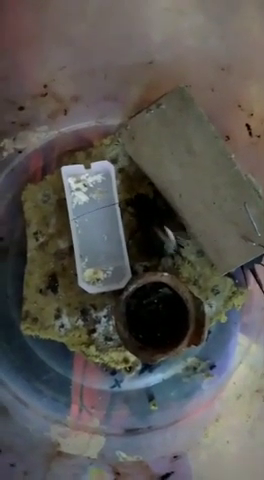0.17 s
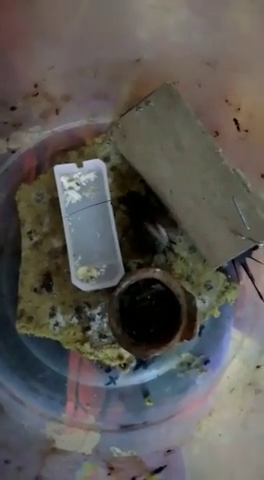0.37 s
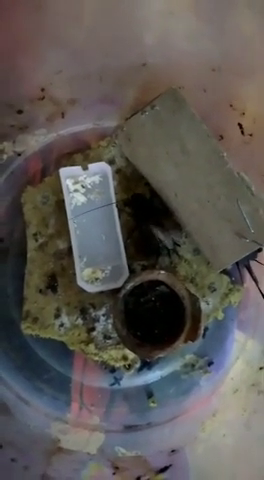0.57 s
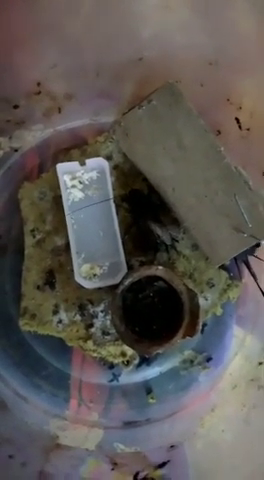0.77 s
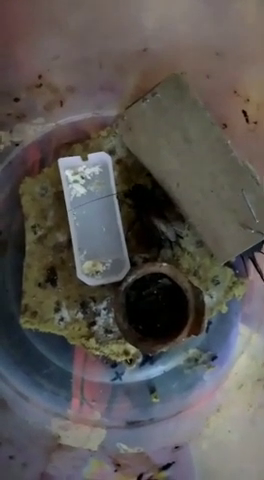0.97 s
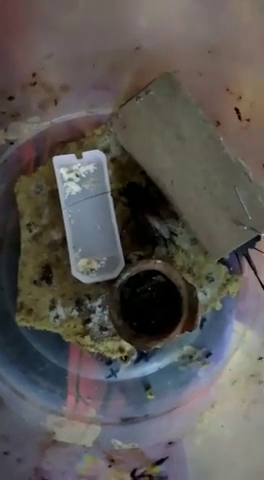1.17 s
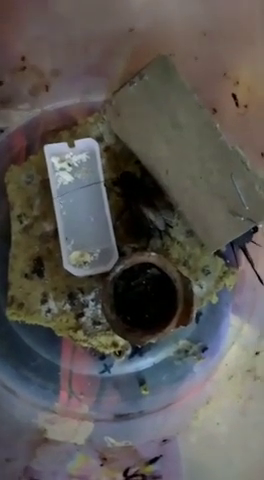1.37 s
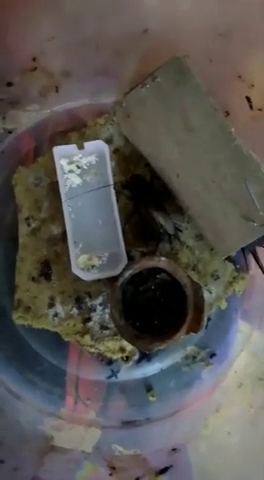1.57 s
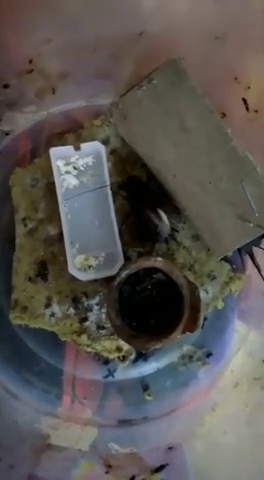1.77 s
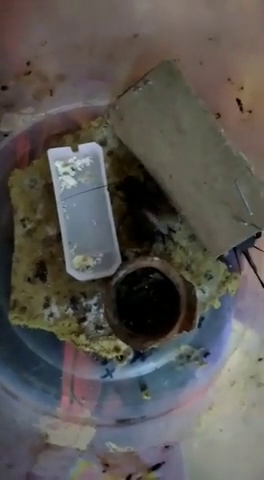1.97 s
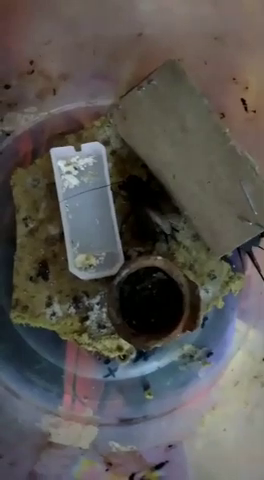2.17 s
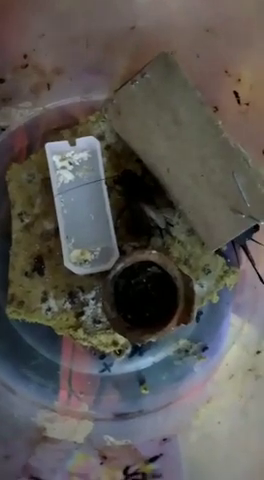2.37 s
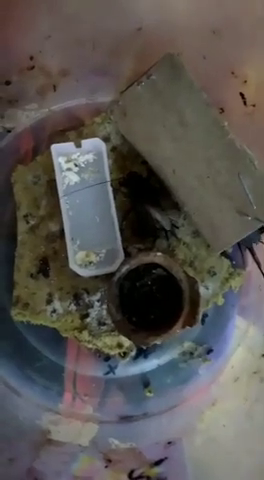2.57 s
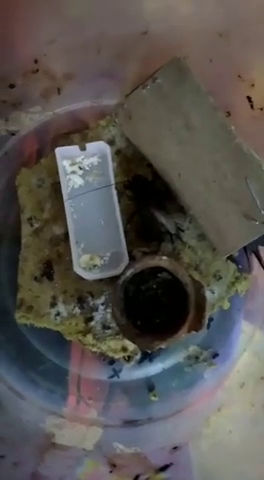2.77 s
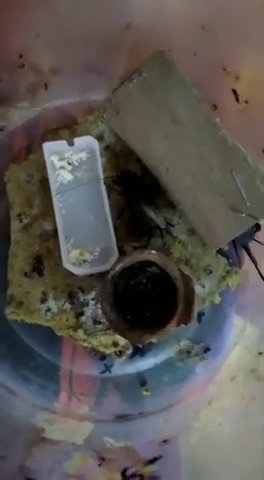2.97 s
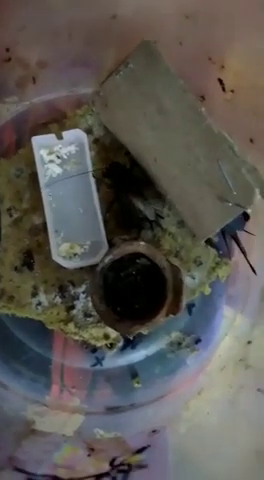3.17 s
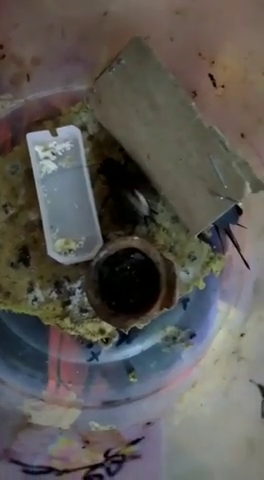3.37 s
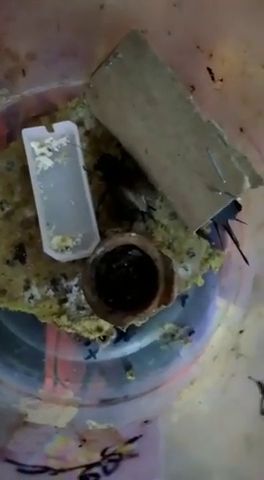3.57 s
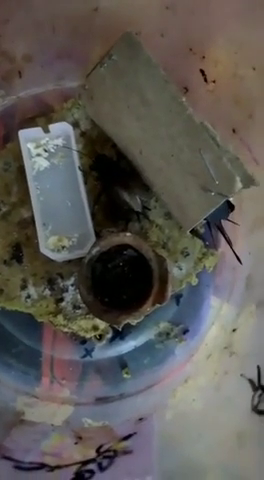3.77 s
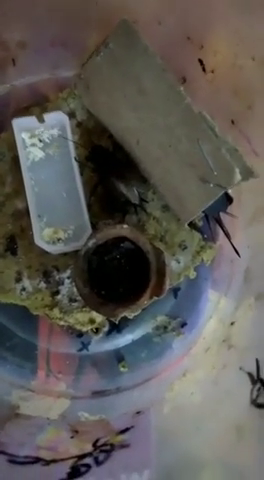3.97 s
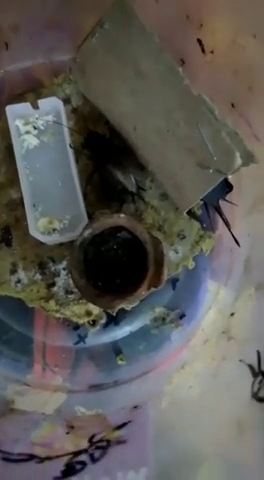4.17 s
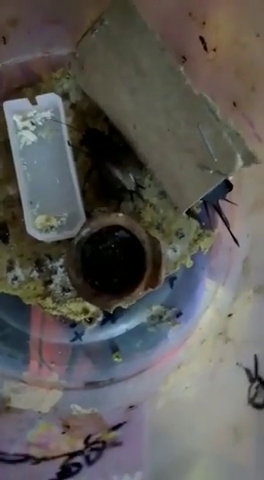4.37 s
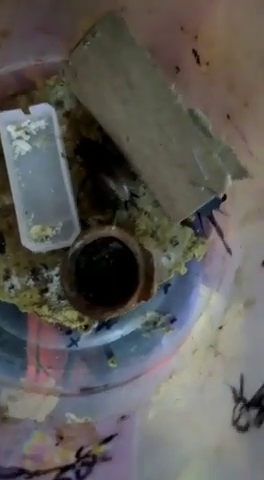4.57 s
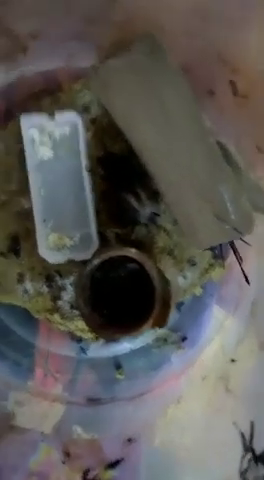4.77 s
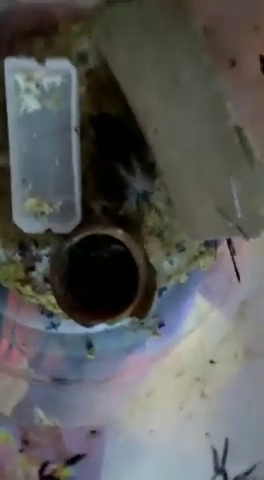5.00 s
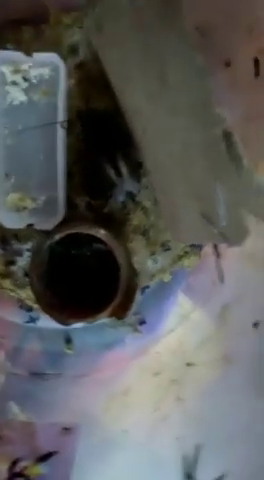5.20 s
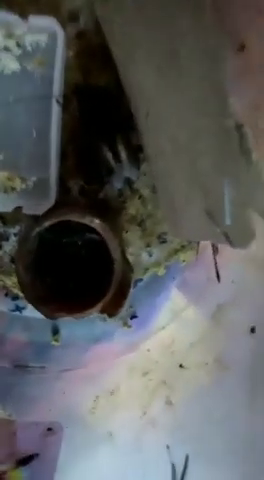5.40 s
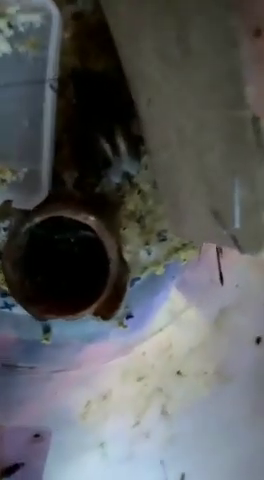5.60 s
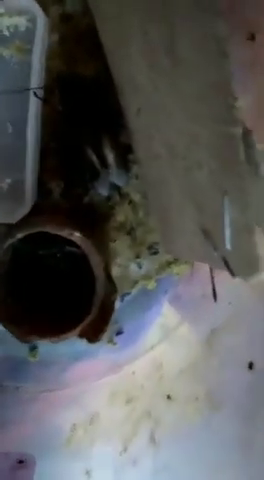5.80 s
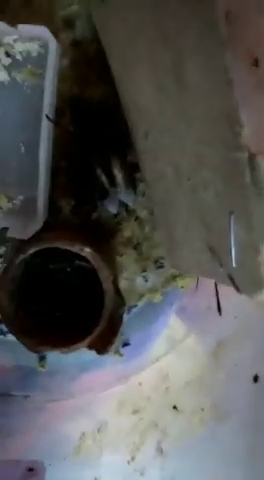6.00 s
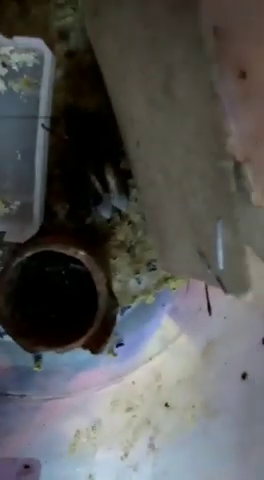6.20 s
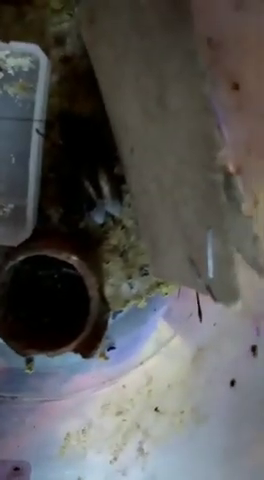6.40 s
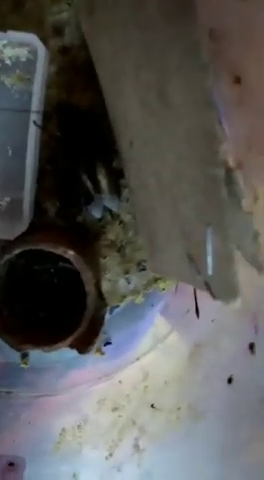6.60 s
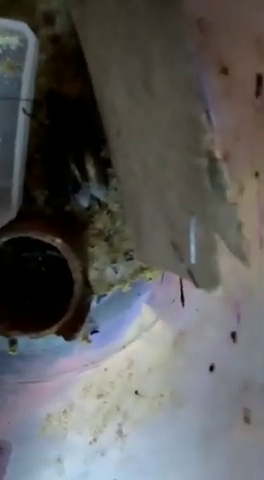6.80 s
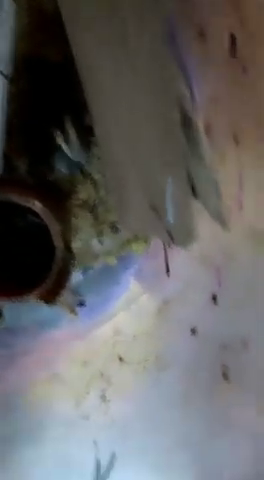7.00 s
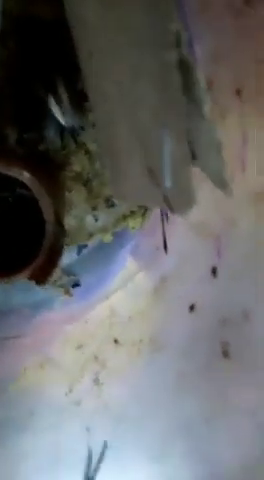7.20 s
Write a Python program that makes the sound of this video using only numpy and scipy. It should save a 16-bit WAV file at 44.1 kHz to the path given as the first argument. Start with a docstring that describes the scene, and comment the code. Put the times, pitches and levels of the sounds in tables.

```python
"""A field cricket chirps in a tub below a hand-held phone: each chirp is a train of swelling wing strokes,
sine tones with overtones plus a noisy rasp, loud enough to overload the nearer microphone.
Fingers knock (ringing modes) and rub (grainy noise) the phone, and a clock ticks through the room.
Traffic hums far outside as swelling low noise with a few faint held tones, perhaps horns.
A noise suppressor turns the treble down between the loud sounds."""
import sys
import numpy as np
from scipy import signal
from scipy.fft import rfft, irfft, next_fast_len
from scipy.io import wavfile
from scipy.ndimage import uniform_filter1d, minimum_filter1d

SR = 44100
rng = np.random.default_rng(int(sys.argv[2]) if len(sys.argv) > 2 else 0)


def transcribe(u):
    """Save the signal u as a 16-bit wav file named by the first command-line argument.

    u: samples, shape (n,) or (channels, n), limited to [-1, 1]; the rate is SR.
    q: integer samples, one column per channel.
    """
    v = np.clip(np.atleast_2d(u).T, -1, 1)
    q = np.round(v * 32767).astype(np.int16)
    wavfile.write(sys.argv[1], SR, q)


N = 319725

# chirps from the first lift of the wings; colour and path to the far microphone change as the phone moves:
# (start [s], wing lift level [dB], overtone offset [dB], jolt offset [dB], far level [dB],
#  far tilt [dB per kHz], far lag [ms], wall echo share [0-1], echo lag [ms])
CHIRP_PATHS = [(.209, -54, -2, .3, -18, 5, 0.52, 0.12, 1.1), (1.709, -49.5, -3, .3, -21, 0.4, .62, 0.3, .6),
               (3.312, -47.5, -0.46, 0.84, -17, -3, 0.67, 0.3, 0.34),
               (4.889, -47.5, 4.5, -4, -15.5, -22, 0.2, 0.94, .617),
               (7.059, -43, 2.5, 0.7, -10, 9.5, 0.58, 0.94, 0.35)]
# spectrum of gritty contact noise: (frequency [Hz], relative level [dB])
GRIT_SPECTRUM = [(800, -27.5), (1400, -9), (2200, -0.5), (3500, -5.5), (6000, -11), (15000, -27.5)]


def amp(db):
    """Decibels to linear gain."""
    return 10 ** (np.asarray(db) / 20)


def unit(x):
    """x scaled to an rms of 1."""
    return x / np.sqrt(np.mean(x ** 2, axis=-1, keepdims=True) + 1e-20)


def smooth(x, size):
    """Two passes of a moving average, size samples wide."""
    return uniform_filter1d(uniform_filter1d(x, size), size)


def along(points, hz):
    """Read (Hz, value) points on a log frequency axis."""
    f, v = np.transpose(points)
    return np.interp(np.log(hz + 1), np.log(f + 1), v)


def filtered(x, response):
    """x times a complex response of frequency."""
    n = x.shape[-1]
    m = next_fast_len(n + 8192)
    return irfft(rfft(x, m) * response(np.fft.rfftfreq(m, 1 / SR)), m)[..., :n]


def noise(spectrum, size):
    """Coloured noise of rms 1."""
    return unit(filtered(rng.standard_normal(size), lambda hz: amp(along(spectrum, hz))))


def patchy(x, depth_db):
    """Noise with random patches of gain in time and frequency, brought back to rms 1."""
    z = signal.stft(x, nperseg=256)[2]
    field = uniform_filter1d(rng.standard_normal(z.shape[1:]), size=6, axis=0)
    field = uniform_filter1d(field, size=5, axis=1)
    gain = amp(depth_db * field / field.std())
    return unit(signal.istft(z * gain, nperseg=256)[1][:, :N])


def add(track, s, x):
    """Mix x into track from s seconds on."""
    part = track[..., round(s * SR):round(s * SR) + x.shape[-1]]
    part += x[..., :part.shape[-1]]


def panned(x, pan_db):
    """Mono to stereo; pan_db is left minus right, and the two gains always sum to 2."""
    return x * amp([[min(pan_db, 0)], [min(-pan_db, 0)]]) * 2 / (1 + amp(-abs(pan_db)))


def ring(modes, attack):
    """One blow on decaying sine modes (Hz, dB, t60 s), each strength varied at random."""
    t = np.arange(SR // 5) / SR
    out = np.zeros(len(t))
    for hz, db, t60 in modes:
        level = amp(db + rng.normal(0, 3.9) - 60 * t / t60)
        out += level * np.sin(2 * np.pi * hz * t)
    return (1 - np.exp(-t / attack)) * out


def room(x):
    """A stereo tail of decaying noise in which each frequency dies at its own speed."""
    # (frequency [Hz], fall time [s])
    fall_times = [(500, .35), (4000, 0.22), (6000, 0.11), (12000, 0.13)]
    hz, t, z = signal.stft(rng.standard_normal((2, SR // 3)), SR, nperseg=256)
    age = t / along(fall_times, hz)[:, None]
    decay = amp(-62 * age) + amp(-18 - 22 * age)  # a quick fall, then a slower and fainter one
    tail = signal.istft(z * decay, SR, nperseg=256)[1]
    delayed = np.pad(x, (150, 0))
    return signal.fftconvolve(delayed[None], tail / np.linalg.norm(tail[0]), axes=1)


def stroke(ms, db, crest, hz, swell_db, overtones_db):
    """The file drives the wing at a falling tooth rate; hz is (start, middle, end). Gives tone and level."""
    # (multiple of the tooth rate, level [dB])
    overtones = [(2, -35.5), (3, -40.5)]
    fade_db = 6.5  # fall from the crest to the end
    t = np.arange(round(ms * SR / 1000)) * 1000 / SR  # ms
    u, crest = t / ms, np.clip(crest, .1, .9)
    rise = swell_db * np.clip(1 - u / crest, 0, 1) ** 1.5
    fall = fade_db * np.clip((u - crest) / (1 - crest), 0, 1) ** 1.9
    fade_in = np.sin(np.pi / 2 * np.clip(t / 3, 0, 1)) ** 2
    fade_out = np.sin(np.pi / 2 * np.clip((ms - t) / 5, 0, 1)) ** 2
    level = amp(db - rise - fall) * fade_in * fade_out
    # uneven teeth shake size and timing, most before the wing has settled
    shake = smooth(rng.standard_normal((2, len(t))), 40)
    size, timing = unit(shake) * (.25 + .6 * np.exp(-u / .2))
    level = level * amp(1.3 * size)
    # the rate tops out early in strong strokes
    bend = np.polyfit((0, 1 / 2, 1), hz, 2)
    rate = np.minimum(np.polyval(bend, np.minimum(u, .95)), 4390)
    phase = 2 * np.pi * np.cumsum(uniform_filter1d(rate, 150)) / SR + 0.026 * timing
    # overtones grow less than the main tone and flutter more
    upper = sum(amp(g) * np.sin(k * (phase + .12 * size)) for k, g in overtones)
    return level * np.sin(phase) + level ** .7 * amp(overtones_db + 4 * timing) * upper, level


def jolt(ms, start_ms):
    """The first teeth ring the wing freely, lower than the driven tone and beating against it."""
    t = np.arange(round(ms * SR / 1000)) * 1000 / SR  # ms
    age = np.clip(t - start_ms, 0, None) / 3.3
    return age ** 2 * np.exp(2 - 2 * age) * np.sin(2 * np.pi * (4170 * t / 1000 + rng.random()))


def wings():
    """All strokes and wing lifts as a mono song, with a stereo rasp of noise that follows their swell."""
    # wing strokes, six to a chirp:
    # (start [s], length [ms], crest level [dB], crest place [0-1], tooth rate at the middle [Hz])
    strokes = [(0.2239, 20.6, -25, .56, 4056), (0.2627, 32, -16, .54, 4097), (0.307, 34.9, -7.5, .71, 4193),
               (0.3599, 33.2, 1.64, .79, 4294), (0.409, 38.3, 1.64, .66, 4248),
               (0.4621, 37.9, 2, .67, 4264), (1.7291, 17.9, -25, .56, 4070), (1.7651, 28, -14.5, 0.6, 4130),
               (1.806, 37, -10, .56, 4175), (1.8565, 36.2, -0.34, .76, 4302), (1.9085, 40, 2, .58, 4225),
               (1.9629, 37.5, 2.06, .59, 4254), (3.3339, 18.8, -19, .35, 4030),
               (3.3724, 27, -14, .45, 4076), (3.4153, 32.1, -8, .58, 4195), (3.4634, 38, 0.16, .66, 4272),
               (3.5147, 36.7, 2.5, .61, 4248), (3.5657, 39.9, 2.5, .54, 4220), (4.9094, 24, -27, .49, 4080),
               (4.9485, 28.65, -18.5, .75, 4180), (4.9942, 33, -10.5, .75, 4195),
               (5.041, 36.9, -1.2, .57, 4320), (5.089, 40.0, 0.7, .45, 4263),
               (5.1413, 40.1, 0.66, .49, 4262), (7.0827, 18, -22.5, .25, 3980),
               (7.1192, 28.0, -13.5, .53, 4054), (7.1625, 33, -9, .75, 4190),
               (7.212, 37.4, -0.4, .65, 4286)]
    # how a stroke goes, by its place in the chirp:
    # (swell [dB], jolt start [ms], jolt level [dB], start over the middle [Hz], end under it [Hz],
    #  overtone offset [dB], rasp drive [dB])
    places = [(14.82, 0.9, -31.5, 310, 343, 0, -3.5), (13.01, 1.01, -35, 250, 440, 1, -4),
              (19.495, 1.01, -34.5, 160, 330, 1.5, -3.5), (21, 4.9, -14, 210, 395, 3, 1.33),
              (18, 1.01, -17.5, 355, 480, -4.5, 2), (16, 1.01, -16.5, 325, 505, -5.5, 2.5)]
    # rasp spectrum: (frequency [Hz], relative level [dB])
    scrape = [(300, -41.5), (1500, -20), (3200, -8), (4200, -6.5), (5100, -3.5), (5900, 1), (7000, -13),
              (8500, 2), (10500, -11.5), (12500, -4.5), (14500, -13.5), (16000, -14.5)]
    song, swell = np.zeros(N), np.zeros(N)
    for row, (s, ms, db, crest, middle) in enumerate(strokes):
        swell_db, jolt_ms, jolt_db, over, under, overtones_db, rasp_db = places[row % len(places)]
        chirp = CHIRP_PATHS[row // len(places)]
        hz = middle + over, middle, middle - under
        tone, level = stroke(ms, db, crest, hz, swell_db, overtones_db + chirp[2])
        add(song, s, tone)
        add(song, s, amp(db + jolt_db + chirp[3]) * jolt(ms, jolt_ms))
        add(swell, s, amp(rasp_db) * level)
    for s, db, *_ in CHIRP_PATHS:
        lift = ring([(3900, 7.0, .02), (8010, -5, .004), (12140, 7.0, 0.0045)], .001)
        add(song, s, amp(db) * lift)
    patches = amp(0.83 * unit(smooth(rng.standard_normal((2, N)), 300)))
    # the power makes the rasp grow less than the strokes
    follow = np.abs(smooth(swell, 600)) ** 0.43
    return song, follow * patches * patchy(noise(scrape, size=(2, N)), depth_db=6.5)


def cricket():
    """Near microphone (right): direct song. Far one: a late copy and its tub-wall echo. Both: the room."""
    # gain curves: (frequency [Hz], gain [dB])
    far_gain = [(6000, 0), (7000, 4), (10000, 4.5), (11500, -3)]
    tub_gain = [(3700, 0), (4300, -2.0), (8500, 4.5), (13000, 11.5)]
    song, rasp = wings()
    out = rasp * amp([[-58], [-40]])
    out[1] += song

    def late(hz, ms):
        return np.exp(-2j * np.pi * hz * ms / 1000)

    for s, *_, db, tilt_db, lag, share, echo in CHIRP_PATHS:
        chirp = song[round(s * SR):][:SR // 2]

        def path(hz):
            tilt = tilt_db * np.clip(hz / 1000 - 4.05, -.25, .3)
            return amp(db + tilt) * late(hz, lag) * (1 + share * late(hz, echo))

        # the second overtone loses less on the way than the main tone
        add(out[0], s, filtered(chirp, lambda hz: path(hz) * amp(along(far_gain, hz))))
        # above the main tone, the tub lets the higher parts out best
        escaped = filtered(chirp, lambda hz: amp(along(tub_gain, hz)))
        scraping = amp(-24.5) * rasp[1, round(s * SR):][:SR // 2]
        add(out, s, room(escaped + scraping) * amp([[-32], [-27]]))
    return out


def fingers():
    """Knocks ring the phone case and thump the hand; rubs are short grainy noise."""
    # (time [s], level [dB], relative snap [dB], relative thump [dB])
    knocks = [(5.858, -29.5, -41.5, -43), (5.868, -34, -33, -15), (6.036, -33.5, -52.5, -27.5),
              (6.616, -30.5, -35.5, -20.5), (6.624, -42, -41.5, -7.5), (6.71, -35, -37, -15.5)]
    # modes of the phone case: (frequency [Hz], level [dB], t60 [s])
    case = [(236, 7, 0.033), (389, 8.5, 0.025), (595, 7.5, 0.029), (647, 5.5, 0.04), (1996, -13, 0.031)]
    # (time [s], length [s], level [dB], relative grit [dB])
    rubs = [(5.536, 0.072, -67.5, -33), (5.881, 0.038, -53.5, -8), (5.911, .02, -51, 1),
            (6.107, 0.094, -53.5, -13), (6.204, 0.015, -58, -19.5), (6.297, 0.092, -63.5, -19),
            (6.533, .05, -55, -38.5), (6.709, 0.028, -50, -3.5), (6.737, 0.033, -57, -13)]
    # rub spectrum: (frequency [Hz], relative level [dB])
    skin = [(80, -2), (250, -1.5), (650, 1.5), (900, -13.5), (1500, -47), (15000, -71)]
    knock_pan_db, rub_pan_db = -20, -18.5  # left minus right
    out, t = np.zeros((2, N)), np.arange(SR // 5) / SR
    for s, db, snap_db, thump_db in knocks:
        snap = amp(snap_db + 24 - 60 * t / 0.022) * rng.standard_normal(len(t))
        thump = amp(thump_db) * ring([(96.3, 3, 0.209), (169, -2.0, 0.26)], 0.0092)
        knock = amp(-6.5) * ring(case, 0.0034) + snap + thump
        add(out, s, panned(amp(db) * knock, knock_pan_db))
    for s, length, db, grit_db in rubs:
        n = round(length * SR)
        grains = amp(3 * unit(uniform_filter1d(rng.standard_normal(n), 200)))
        rub = noise(skin, size=n) + amp(grit_db) * noise(GRIT_SPECTRUM, size=n)
        add(out, s, panned(amp(db) * np.hanning(n) ** .5 * grains * rub, rub_pan_db))
    return out


def clock():
    """A soft double tick each second: ringing modes and gritty noise, heard through the room."""
    # (frequency [Hz], level [dB], t60 [s])
    tick_modes = [(1517, -7.5, .015), (2080, -6.5, 0.02462), (3083, -10.5, 0.0094), (4896, -13, .01)]
    out, tick = np.zeros((2, N)), np.zeros(SR // 4)
    fade = amp(-60 * np.arange(SR // 5) / SR / 0.043)
    for s, db in [(0, -69), (.014, -70)]:
        grit = 5.9 * fade * noise(GRIT_SPECTRUM, size=SR // 5)
        add(tick, s, amp(db) * (ring(tick_modes, .0005) + grit))
    for second in range(7):
        add(out, second + .295, room(tick))
    return out


def outside():
    """Traffic swells as low noise partly shared by both channels, with wavering held sine tones on it."""
    # (time [s], level [dB])
    traffic = [(0, -76.5), (1, -81), (2, -76.5), (2.3, -68.5), (2.7, -75), (3.8, -75), (4.4, -69),
               (4.999, -65.5), (5.5, -68.5), (5.999, -83.5), (7.25, -73.5)]
    # traffic spectrum: (frequency [Hz], relative level [dB])
    street = [(150, -26), (250, -7), (380, 3.5), (550, -4.5), (800, -22.5), (1300, -35), (2500, -57.5)]
    # held tones: (time [s], length [s], frequency [Hz], level [dB])
    tones = [(0.649, 0.19, 412, -75), (1.098, 0.32, 434, -75), (1.45, 0.28, 496, -75.5),
             (1.78, 0.14, 524, -71), (2.099, .4, 408.5, -75), (2.897, .4, 411, -75),
             (3.694, 0.29, 428.5, -73.5), (4.004, 0.3, 354, -71.5), (4.507, 0.28, 381.3, -72),
             (4.449, 0.91, 127.9, -70), (5.198, 0.2, 389, -71), (5.603, 0.14, 279, -72.5),
             (6.75, 0.17, 452, -74)]
    s, db = np.transpose(traffic)
    common, left, right = noise(street, size=(3, N))
    swell = amp(np.interp(np.arange(N) / SR, s, db))
    out = swell * (common + 0.66 * np.array([left, right]))
    for s, length, hz, db in tones:
        n = round(length * SR)
        drift = 0.0036 * unit(uniform_filter1d(rng.standard_normal(n), 2000))
        tone = np.sqrt(2) * np.sin(2 * np.pi * hz * np.cumsum(1 + drift) / SR)
        add(out, s, panned(amp(db) * signal.windows.tukey(n, .4) * tone, rng.normal(0, 3)))
    return out


def background_air():
    """A steady stereo noise floor, strongest in the lowest bass."""
    # (frequency [Hz], relative level [dB])
    air = [(3, 1.5), (12, -8.5), (33, -15), (90, -23), (250, -31), (600, -40), (1100, -45), (3500, -48),
           (15500, -55)]
    return amp(-53.5) * noise(air, size=(2, N))


def scene():
    """Mix all the sources as they reach the two microphones."""
    return cricket() + fingers() + clock() + outside() + background_air()


def suppressed(x):
    """Noise suppressor: turns treble bands down unless something loud and high passes or has just passed."""
    # (from [Hz], to [Hz], look-ahead [s])
    gate_bands = [(800, 3300, .002), (3300, 90000, .025)]
    heard = filtered(x, lambda hz: hz > 1500)
    power = np.abs(uniform_filter1d(np.max(heard ** 2, axis=0), 400))
    level_db = 10 * np.log10(power + 1e-14)

    def above(hz, edge):
        return 1 / (1 + (edge / (hz + 1)) ** 4)

    out = x
    for low, high, ahead_s in gate_bands:
        band = filtered(x, lambda hz: above(hz, low) - above(hz, high))
        ahead, hold = round(ahead_s * SR), round(.132 * SR)
        # the loudest level in the window from hold before to ahead after
        held_db = -minimum_filter1d(-level_db, size=ahead + hold, origin=(hold - ahead) // 2)
        shut = 1 / (1 + np.exp(held_db + 32))  # half shut at -32 dB
        out = out - band * (1 - amp(-20 * uniform_filter1d(shut, 400)))
    return out


def record(dry):
    """A slightly lopsided microphone; the converter clips at its own rate, so high overtones fold back down."""
    # ratio of the converter's rate to SR: (up, down)
    up, down = (160, 147)
    top_hz = 15650
    # loud strokes also push the membrane's rest position: a low thump
    thump = amp(-36) * filtered(dry ** 2, lambda hz: 1 / (1 + (hz / 150) ** 2))
    fast = signal.resample_poly(dry + 0.011 * dry ** 2 + thump, up, down, axis=1)
    fast = np.clip(fast, -.9, .9)
    back = signal.resample_poly(fast, down, up, axis=1)[:, :N]
    return filtered(suppressed(back), lambda hz: hz < top_hz)


dry = scene()
out = record(dry)
transcribe(out)
```